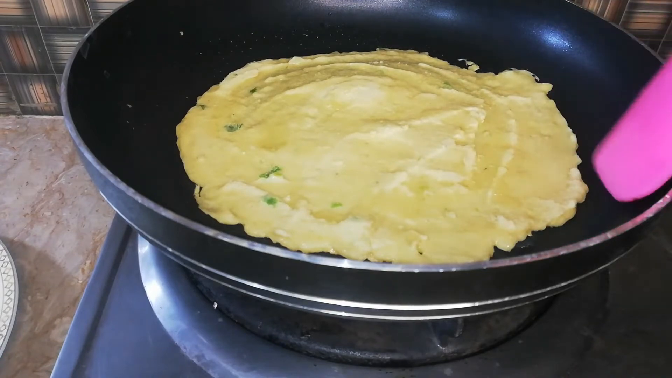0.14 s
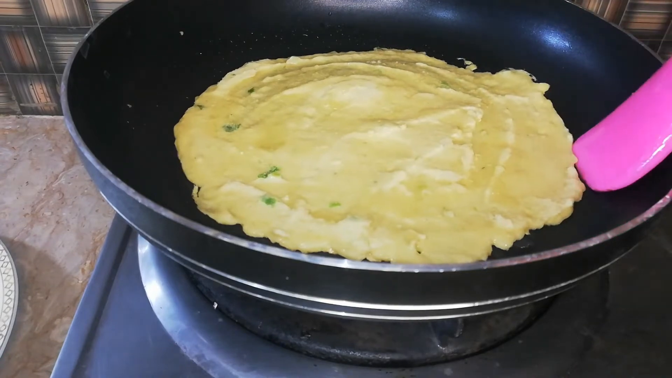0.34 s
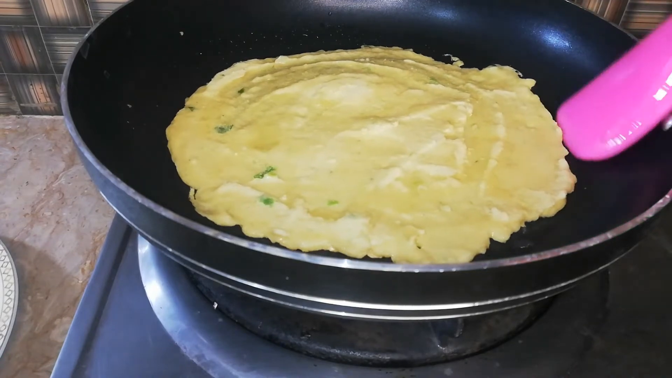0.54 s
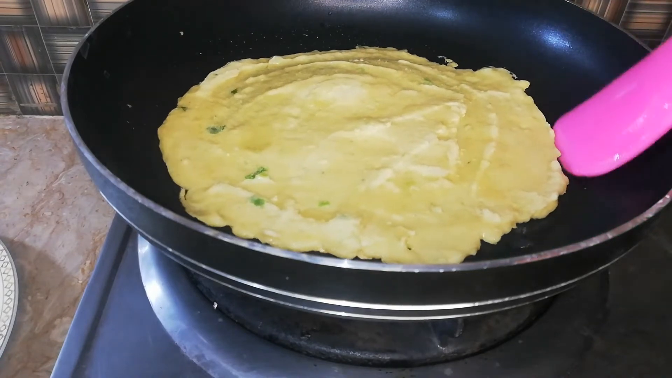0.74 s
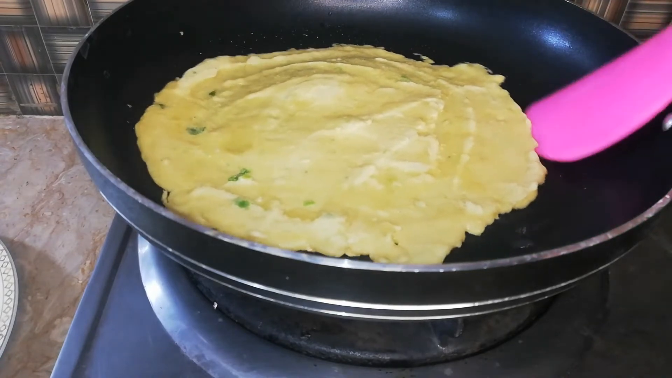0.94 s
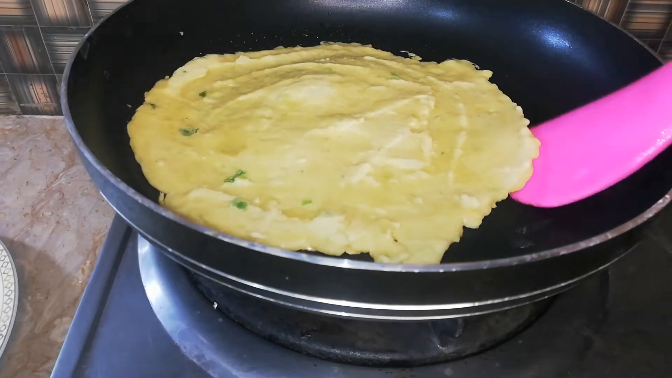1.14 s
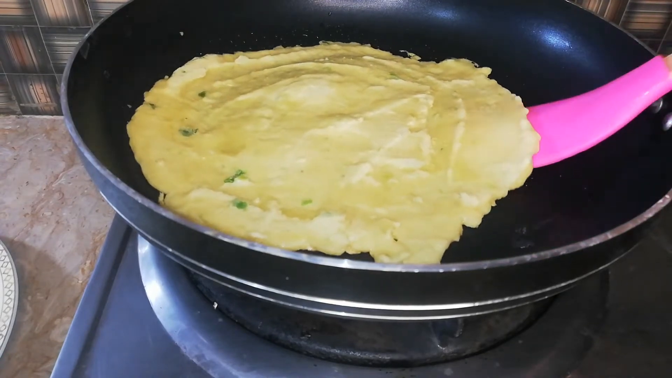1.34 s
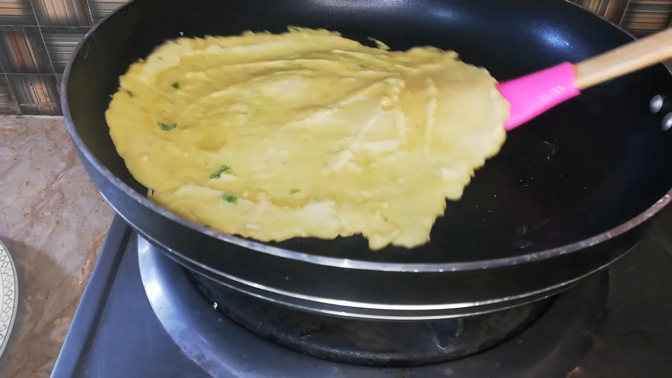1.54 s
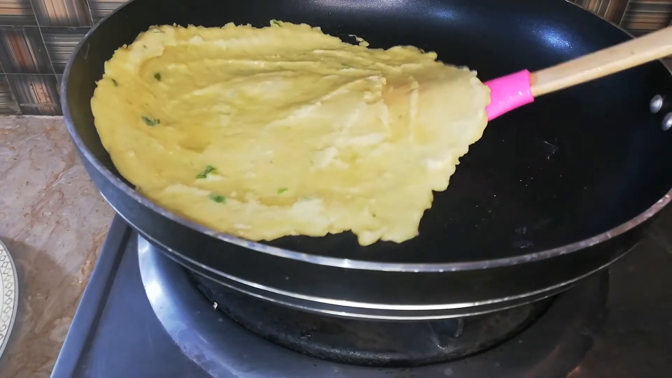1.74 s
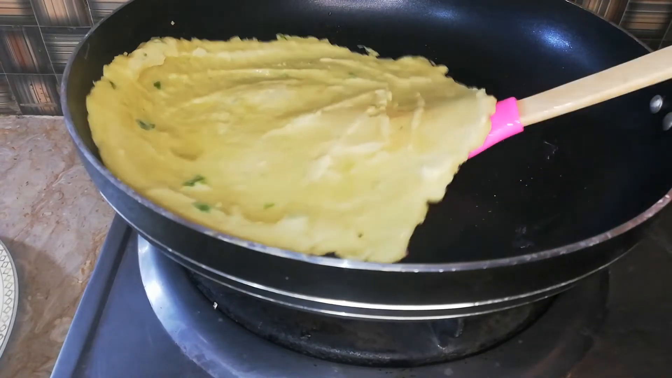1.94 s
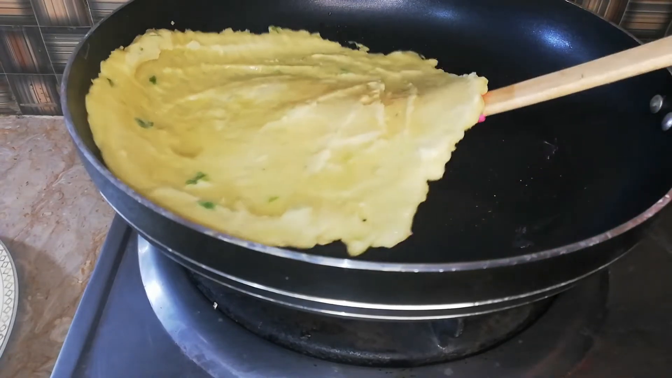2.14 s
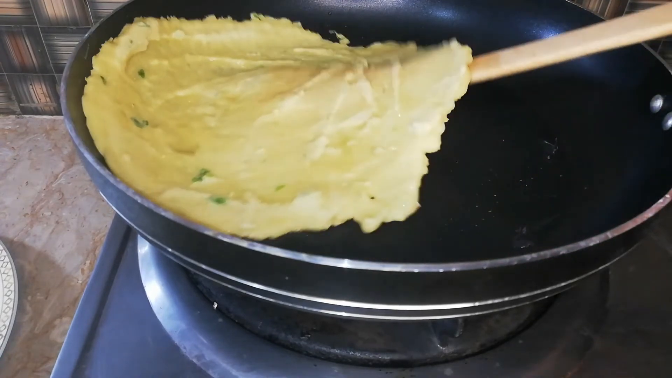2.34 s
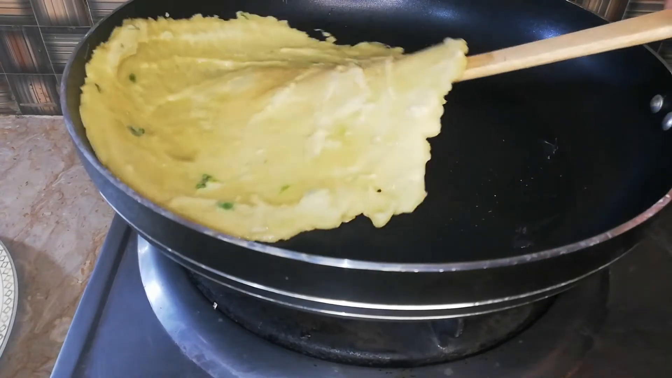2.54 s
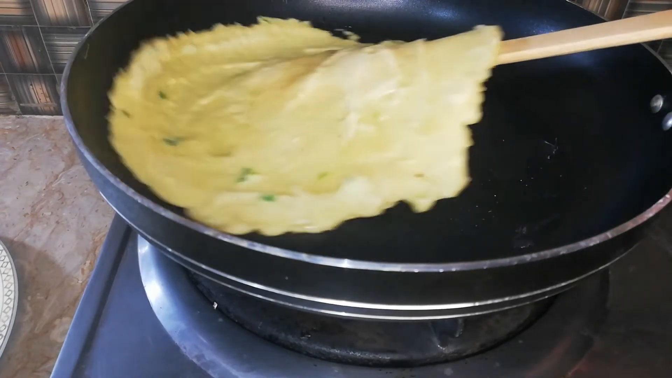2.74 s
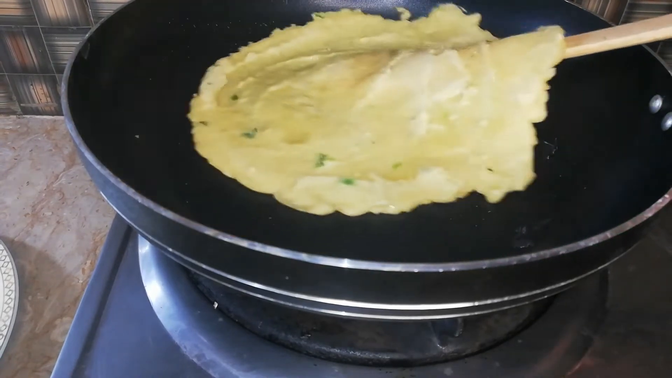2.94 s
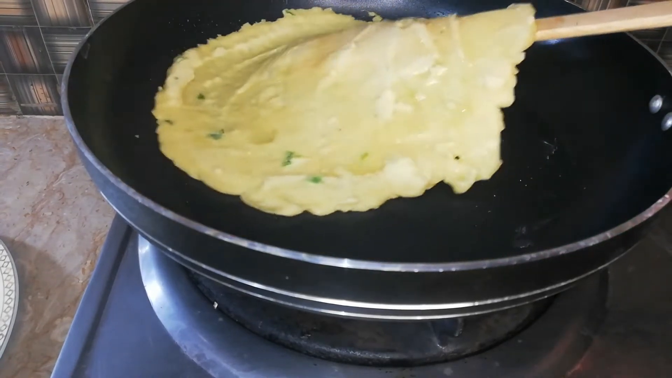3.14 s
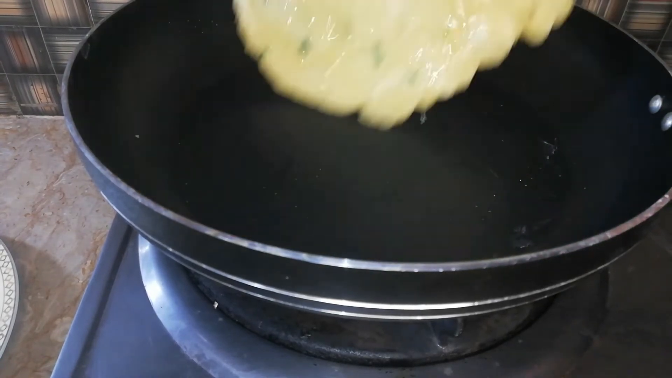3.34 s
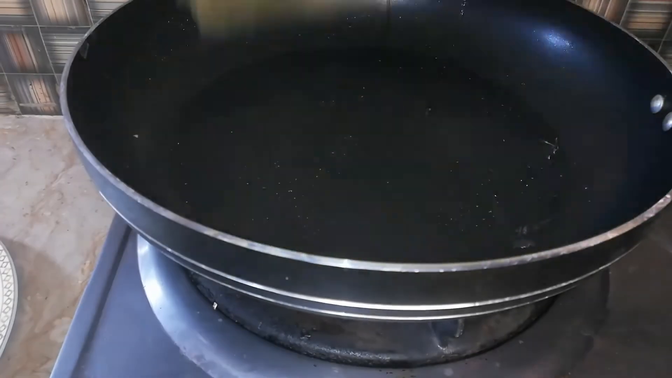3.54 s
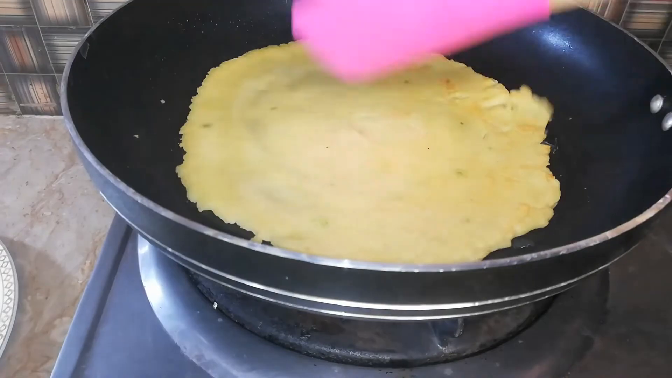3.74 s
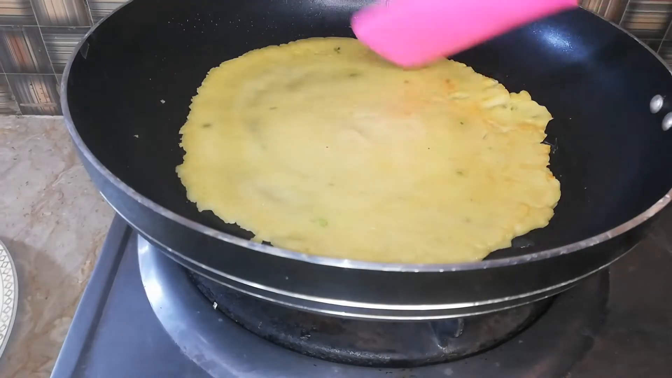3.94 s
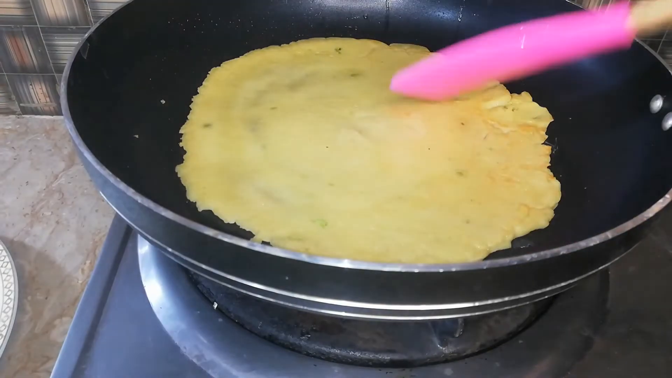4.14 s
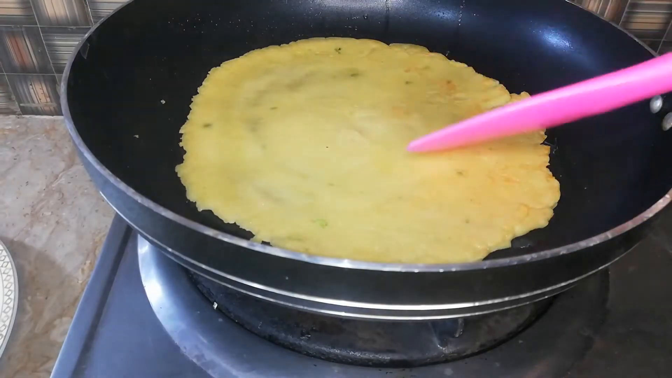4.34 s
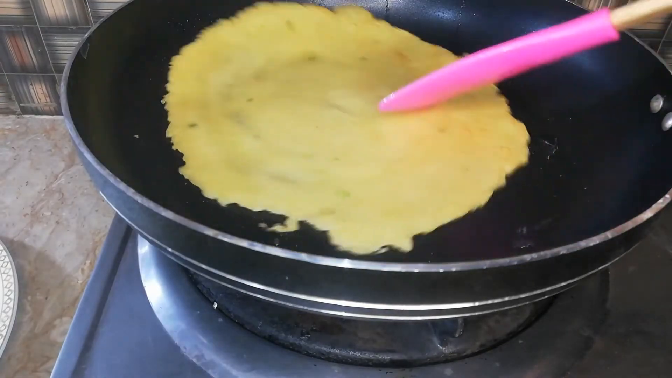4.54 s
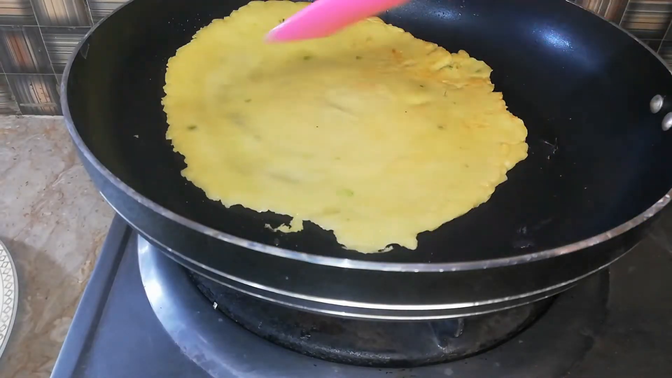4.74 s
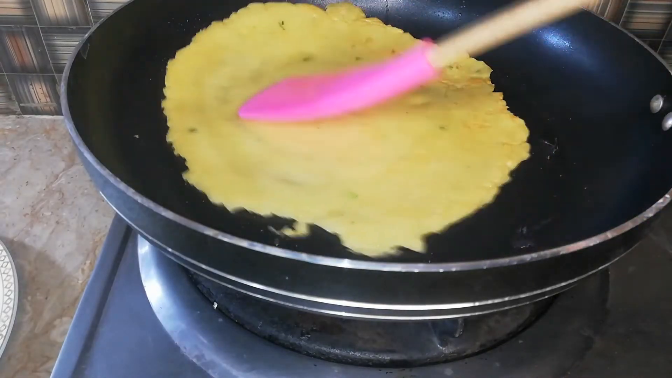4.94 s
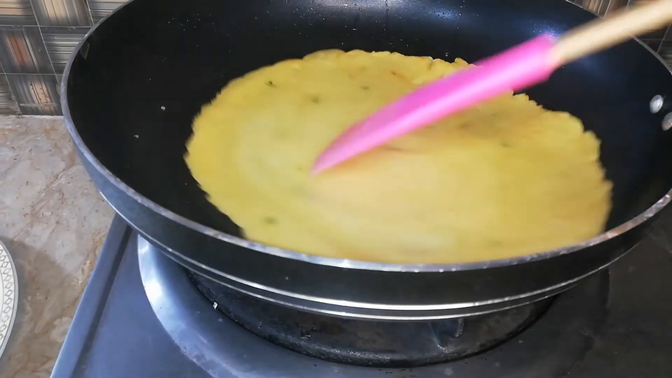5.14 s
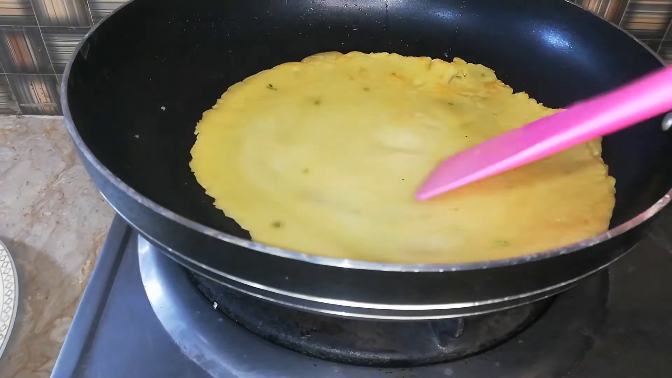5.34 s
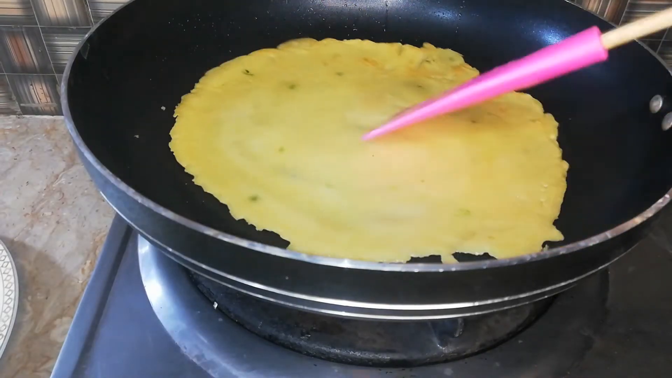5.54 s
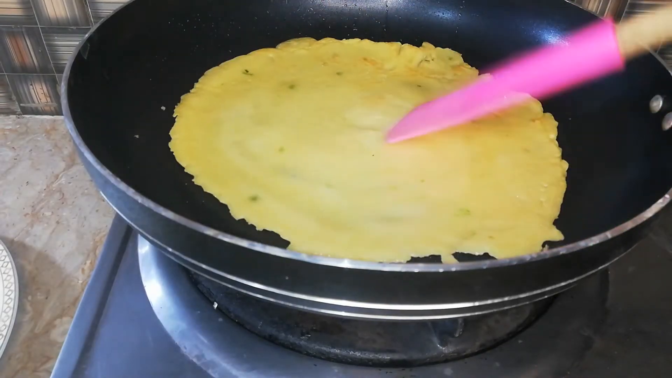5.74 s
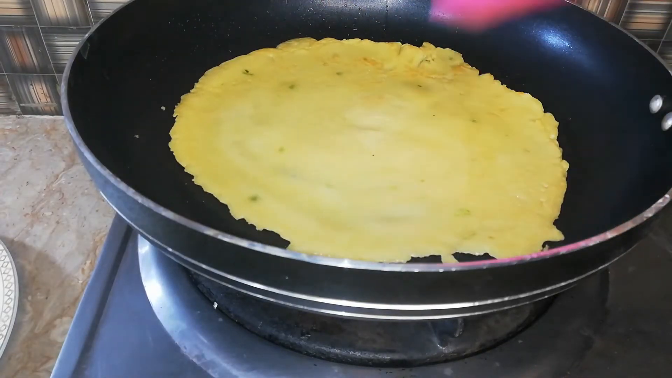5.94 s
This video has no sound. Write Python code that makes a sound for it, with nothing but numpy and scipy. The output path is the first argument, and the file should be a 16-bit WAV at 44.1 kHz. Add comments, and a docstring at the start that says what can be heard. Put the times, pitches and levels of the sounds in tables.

```python
"""A small kitchen, just above a frying pan on a softly rushing gas burner.
A silicone spatula rasps under a crepe and tears it loose, and the pan rocks and clacks on its support.
The crepe is dragged up in tugs, with hoarse squeaks, then flipped: it slaps down and the metal rings.
Its wet side flashes into steam and sizzles on while it is pushed around. Oil spits now and then."""
import sys
import numpy as np
from scipy import signal
from scipy.fft import rfft, irfft, next_fast_len
from scipy.io import wavfile
from scipy.ndimage import uniform_filter1d, map_coordinates

SR = 44100
rng = np.random.default_rng(int(sys.argv[2]) if len(sys.argv) > 2 else 0)


def transcribe(u):
    """Save the signal u as a 16-bit wav file named by the first command-line argument.

    u: samples, shape (n,) or (channels, n), limited to [-1, 1]; the rate is SR.
    q: integer samples, one column per channel.
    """
    v = np.clip(np.atleast_2d(u).T, -1, 1)
    q = np.round(v * 32767).astype(np.int16)
    wavfile.write(sys.argv[1], SR, q)


N = 268569
LOOSE_S, LIFT_S, LAND_S = 1.17, 3.317, 3.594  # the crepe comes loose, leaves the pan, lands wet side down
CONTACT_S, RELEASE_S = 0.088, 0.046  # attack and release of its contact with the pan


def amp(db):
    """Decibels to gain."""
    return 10 ** (np.asarray(db) / 20)


def unit(x):
    """Scale to rms 1."""
    return x / np.sqrt(np.mean(x ** 2) + 1e-20)


def balance(db):
    """Stereo gains that put the left channel db above the right."""
    return amp(db * np.array([[0.5], [-0.5]]))


def along(points, hz):
    """Read a curve of (Hz, value) points on a log frequency axis."""
    point_hz, values = np.transpose(points)
    return np.interp(np.log(hz + 1), np.log(point_hz + 1), values)


def resonance(hz, centre_hz, half_width_hz):
    """A resonant peak of height 1."""
    return 1 / (1 + ((hz - centre_hz) / half_width_hz) ** 2)


def filtered(x, response):
    """EQ a signal with a gain that is a function of frequency."""
    n = x.shape[-1]
    size = next_fast_len(n + 8192)
    return irfft(rfft(x, size) * response(np.fft.rfftfreq(size, 1 / SR)), size)[..., :n]


def add(track, s, sound):
    """Mix a sound into a track from time s."""
    start = max(round(s * SR), 0)
    part = sound[..., :N - start]
    track[:, start:start + part.shape[-1]] += part


def wobble(rate):
    """Smooth random modulation, rate points a second."""
    return map_coordinates(rng.standard_normal(int(N * rate / SR) + 4), [np.arange(N) * rate / SR])


def held(start, end, attack_s, release_s):
    """Envelope that rises from start, holds and dies away after end."""
    t = np.arange(N) / SR
    return np.clip((t - start) / attack_s, 0, 1) * np.exp(-np.maximum(t - end, 0) / release_s)


def struck(s, rise_s, t60):
    """Envelope that shoots up to its peak at time s, then decays."""
    t = np.arange(N) / SR - s
    return amp(-20 * np.maximum(-t, 0) / rise_s - 60 * np.maximum(t, 0) / t60)


def together(parts):
    """Joint envelope of unrelated (dB, envelope) parts, which add in power."""
    return np.sqrt(sum((amp(db) * shape) ** 2 for db, shape in parts))


def grains(rate, spread_db):
    """Two trains of tiny random clicks, rate a second, of widely varying size."""
    fires = rng.random((2, N)) < rate / SR
    size = amp(spread_db * np.clip(rng.standard_normal((2, N)), -2.5, 2.5))
    return unit(fires * rng.choice([-1, 1], (2, N)) * size)


def shifting(pair, depth_db, blur=5):
    """A drifting random EQ: resonances come and go as the patch of contact changes."""
    spectrum = signal.stft(pair, nperseg=1024)[2]
    drift = rng.standard_normal(spectrum.shape[1:])
    for axis in (0, 0, 1):  # smooth twice over frequency, once over time
        drift = uniform_filter1d(drift, blur, axis)
    return unit(signal.istft(spectrum * amp(depth_db * unit(drift)), nperseg=1024)[1][:, :N])


# Stereo width. Each row: frequency in Hz, side level over mid in dB.
STEREO_WIDTH = [(25, -30), (60, -22), (110, -18), (180, -13), (270, -4), (450, -1), (740, 0), (1220, -5),
                (2010, 0), (3330, .5), (15000, 0)]
def diffuse(pair, colour):
    """Two unrelated signals become coloured stereo of rms 1, near mono in the bass."""
    def response(hz):
        width = amp(along(STEREO_WIDTH, hz))
        return colour(hz) * np.array([np.ones_like(hz), width]) / np.sqrt(1 + width ** 2)
    mid, side = filtered(pair, response)
    return unit(np.array([mid + side, mid - side]))


def noise(colour, samples=N):
    """Coloured stereo noise of rms 1."""
    return diffuse(rng.standard_normal((2, samples)), colour)


# The kitchen's reverb. Each row: frequency in Hz, time to fall 60 dB in seconds.
ROOM_DECAY = [(150, 0.91), (800, 0.39), (3000, 0.33), (12000, 0.11)]
def kitchen(x, wet_db, build_s=0.00039):
    """Add a fresh reverb tail from the tiled walls; the treble dies first."""
    hz, t, spectrum = signal.stft(rng.standard_normal((2, SR // 2)), SR, nperseg=256)
    decay = amp(-60 * t / along(ROOM_DECAY, hz)[:, None])
    tail = diffuse(signal.istft(spectrum * decay, SR, nperseg=256)[1], np.ones_like)
    tail *= 1 - np.exp(-np.arange(tail.shape[1]) / SR / build_s)
    wet = signal.fftconvolve(x, tail / np.linalg.norm(tail[0]), axes=1)
    return amp(wet_db) * wet + np.pad(x, ((0, 0), (0, wet.shape[1] - x.shape[1])))


def near_walls(x, count=5, gain=0.17):
    """Weak early echoes off the pan rim and the tiles give a fine comb colour."""
    delays_s = rng.uniform(0.002, 0.012, (count, 2, 1))
    comb = lambda hz: 1 + gain * np.exp(-2j * np.pi * hz * delays_s).sum(axis=0)
    return filtered(x, comb) / np.sqrt(1 + count * gain ** 2)


# EQ curves of the room rumble and the flame. Each row: frequency in Hz, gain in dB.
RUMBLE_EQ = [(20, -4), (32, -3.5), (50, 2), (80, -3), (115, 0.5), (150, 0.5), (190, -10.5), (240, -6),
             (300, -12.5), (410, -10), (500, -29.5), (900, -61)]
FLAME_EQ = [(400, -19), (550, -4.5), (850, 4), (1050, 1.5), (1300, 4), (2000, -1.5), (4000, -4.5),
            (6000, -3), (8000, -23), (11000, -32), (16000, -19)]
def burner(rumble_db=-62.5, flame_db=-62, whistle_db=-72, whistle_hz=6047):
    """The bed: low room rumble, the soft rush of the gas flame and the faint whistle of its jet."""
    rumble = noise(lambda hz: amp(along(RUMBLE_EQ, hz)))
    flame = noise(lambda hz: amp(along(FLAME_EQ, hz))) * amp(0.85 * wobble(5.83))
    whistle = noise(lambda hz: resonance(hz, whistle_hz, 22))
    return amp(rumble_db) * rumble + amp(flame_db) * flame + amp(whistle_db) * whistle


# Modes of the pan and stove top. Each row: frequency in Hz, relative level when struck in dB,
# time to fall 60 dB in seconds, boost when rubbed in dB.
PAN_MODES = [(93.8, -19, 0.7, -2), (158.4, -11, 0.28, 0), (183.3, -6.5, 0.32, 2), (225.5, -6.5, 0.47, 7),
             (261.8, -10, 0.27, 5), (305.2, -10, 0.31, 5), (390.5, -19, .3, 0), (407.7, -10, 0.39, 6),
             (500, -19.5, 0.42, 2), (745, 1, 0.11, 5), (774, -9, 0.31, -0.5), (887, -10.5, 0.35, 2.5),
             (1051, 2.5, 0.086, 2.5), (1178, -4, 0.18, 5.5), (1351, -2, 0.16, 2.5), (1654, 0.5, 0.11, 6.5),
             (1824, -13, .2, 2.5), (2011, 1, 0.1, 5.5), (2030, -11, 0.37, 1), (2106, -7, .22, -1),
             (2320, -18, .14, 2), (2686, -6, 0.16, 4), (2774, 0.5, 0.066, 5), (3360, -9, 0.11, 5.5),
             (3605, -4.5, 0.14, 2.5), (4530, -14, 0.2, 1), (4860, -11, 0.13, 3), (5770, -10, .08, 3),
             (7150, -24, .1, 2.5), (7560, -20, .1, 1.5)]
def pan_ring(cutoff_hz, build_cycles=2.4):
    """The modes ring after one blow; a soft contact has a low cutoff and leaves the high ones quiet."""
    t = np.arange(SR * 3 // 4) / SR
    out = np.zeros((2, len(t)))
    for hz, db, t60, _ in PAN_MODES:
        phase = rng.uniform(0, 2 * np.pi)
        spread = rng.choice([-1, 1]) * np.arctan(amp(along(STEREO_WIDTH, hz))) * np.array([[1], [-1]])
        attack = 1 - np.exp(-t * hz / build_cycles)
        decay = amp(db + rng.normal(0, 1) - 60 * t / t60)
        lowpass = 1 / np.sqrt(1 + (hz / cutoff_hz) ** 6)
        out += attack * decay * lowpass * np.sin(2 * np.pi * hz * t + phase + spread)
    return out


def pan_grains(curve, rate, spread_db, share=1):
    """A grain texture, shaped by an EQ curve and a share of the boost at each pan mode."""
    def colour(hz):
        boost_db = sum(db * resonance(hz, mode_hz, 36 * np.sqrt(mode_hz / 2000))
                       for mode_hz, _, _, db in PAN_MODES)
        return amp(along(curve, hz) + share * boost_db)
    return diffuse(grains(rate, spread_db), colour)


def through_modes(hz, direct_db=-7):
    """A blow's colour: each mode passes as much as it rings, the rest leaks out directly."""
    mode_power = sum(amp(db) ** 2 * resonance(hz, mode_hz, 24 * np.sqrt(mode_hz / 2000))
                     for mode_hz, db, _, _ in PAN_MODES)
    return np.sqrt(amp(direct_db) ** 2 + mode_power)


def contact():
    """Two envelopes of the loose crepe touching the pan: cooked side down, then wet side down."""
    return held(LOOSE_S, LIFT_S, CONTACT_S, RELEASE_S), held(LAND_S, N / SR, CONTACT_S, RELEASE_S)


# Tugs slide the crepe and let steam out from under it. Each row: time of top speed in seconds,
# build-up in seconds, rub level in dB, steam level in dB, fizz boost or cut in dB.
CREPE_TUGS = [(1.648, 0.023, -51.5, -51.5, 0), (1.76, 0.089, -53.5, -72, 1),
              (1.923, 0.14, -54.5, -51, -2.5), (2.1, 0.066, -53.5, -49, 9.5), (2.218, 0.036, -51, -50, -5),
              (2.287, 0.039, -54.5, -48.5, -2), (2.415, 0.034, -49.5, -50.5, -5),
              (2.5, 0.052, -55.5, -55, -6), (2.815, 0.083, -57, -51, -5), (2.885, 0.048, -53.5, -47, -5),
              (3.0, 0.059, -57.5, -58, -4), (3.205, 0.079, -62, -51, -4), (3.81, 0.087, -54.5, -52.5, -1.5),
              (3.985, 0.089, -53, -54.5, 1), (4.395, 0.036, -60, -50.5, -5), (4.59, 0.033, -58, -63, 2),
              (5.09, 0.18, -52.5, -55, 2.5), (5.25, 0.056, -56, -56.5, 2), (5.44, 0.18, -56, -58, 3),
              (5.83, .06, -63, -66, 4)]
def tugs(stop_share=0.85):
    """Each tug's speed curve, which builds up and stops a little faster, with its three levels."""
    for s, build_s, rub_db, steam_db, fizz_db in CREPE_TUGS:
        t = np.arange(N) / SR - s
        speed = np.exp(-(t / np.where(t < 0, build_s, stop_share * build_s)) ** 2)
        yield speed, rub_db, steam_db, fizz_db


def steam(bare_pan_db=-64.5, rest_db=-62, loose_db=-57, wet_side_db=-58.5, flash_db=-38, boil_db=-51.5):
    """The sizzle's envelope: steam swells with each tug, flashes as wet batter lands, then boils down."""
    loose, wet = contact()
    resting = held(-1, LIFT_S, CONTACT_S, RELEASE_S)
    steady = [(bare_pan_db, 1), (rest_db, resting), (loose_db, loose), (wet_side_db, wet)]
    flash = struck(LAND_S, rise_s=0.0033, t60=0.37)
    boil = struck(LAND_S + 0.28, rise_s=CONTACT_S, t60=3.2)
    puffs = [(db, speed) for speed, _, db, _ in tugs()]
    sputter = amp(0.5 * (loose + wet) * wobble(25))
    return together(steady + [(flash_db, flash), (boil_db, boil)] + puffs) * sputter


# EQ curve of the sizzle. Each row: frequency in Hz, gain in dB.
SIZZLE_EQ = [(800, -24), (2000, -3), (3500, -2), (5000, 0.5), (6200, -0.5), (7800, 2), (10000, -3),
             (12500, -8.5), (16000, -11.5)]
def sizzle(crackle_db=-10, sputter_db=1.2, fizz_hz=8500):
    """Countless small steam bursts make a hiss with crackle on top; the finest fizz comes in spurts."""
    hiss = shifting(pan_grains(SIZZLE_EQ, rate=12000, spread_db=4.5, share=0.49), depth_db=1.1)
    fizz = filtered(hiss, lambda hz: hz ** 4 / (hz ** 4 + fizz_hz ** 4))
    spurts_db = sum(db * speed for speed, _, _, db in tugs())
    flicker_db = sputter_db * sum(contact()) * wobble(22.12)
    hiss += fizz * (amp(spurts_db + flicker_db) - 1)
    crackle = pan_grains(SIZZLE_EQ, rate=300, spread_db=5, share=0.49)
    return steam() * (hiss + amp(crackle_db) * crackle) * balance(1.2)


def fine_spray(level_db=-67, centre_hz=8000, width_octaves=0.7):
    """Tiny droplets spit at random once the wet side is down."""
    band = lambda hz: np.exp(-0.5 * (np.log2((hz + 1) / centre_hz) / width_octaves) ** 2)
    ticks = diffuse(grains(rate=45, spread_db=2), band)
    _, wet = contact()
    return amp(level_db) * wet * kitchen(ticks, wet_db=-4)[:, :N]


# Sharp oil pops, plus two lower ticks: light spatula taps or wet smacks. Each row: start in seconds,
# level in dB, pitch in Hz, ring against the spike in dB, left over right in dB.
POPS_AND_TICKS = [(1.5092, -30, 7000, -14, 3), (1.5616, -36, 6500, -14, 3), (1.6435, -37, 7500, -14, -3),
                  (1.8364, -32, 8000, -10, 5), (1.9293, -33, 7500, -10, 2), (2.102, -22, 4830, -13, -4),
                  (2.1086, -32, 6000, -11, -5), (2.2009, -33, 6000, -12, 1), (2.343, -32.5, 10000, -23, 7),
                  (2.592, -30, 9000, -23, 2), (2.6495, -32, 9500, -18, -5), (2.6932, -34, 7000, -14, -5),
                  (2.8841, -34, 7000, -12, -4), (3.1034, -40, 8000, -12, 5), (3.769, -29.5, 6000, -14, 5),
                  (3.776, -28, 2477, 3, -5), (3.8061, -30, 8350, -10, 7), (3.8518, -35, 2380, -3, -3),
                  (3.855, -29, 6500, -14, 4), (3.976, -28, 6500, -13, 7), (4.2448, -37, 7050, -10, 1),
                  (4.3932, -37, 7950, -6, 4), (4.4005, -34, 7970, -6, 4), (4.4812, -30, 9000, -8, 5),
                  (4.483, -25.5, 8000, -16, 7), (4.5892, -37, 8950, -12, 5), (4.7128, -45, 6000, -12, -2),
                  (4.8088, -34.5, 8200, -4, 6), (4.8163, -33, 9000, -12, 5), (4.9055, -37, 7460, -10, -6),
                  (5.0438, -34, 8780, -6, 6), (5.2177, -32, 9000, -14, 6), (5.3084, -32.5, 8000, -10, 9),
                  (5.4245, -34.5, 8040, -8, 7), (5.513, -29, 7450, -19, 7), (5.5387, -32, 11000, -12, -2),
                  (5.5516, -32.5, 7900, 3, 3), (5.5913, -29.5, 9400, -3, 5), (5.6381, -31.5, 8500, -18, 2),
                  (5.7359, -37, 8000, -16, 8), (5.8105, -30.5, 7500, -14, -1), (5.818, -35, 8500, -14, 3),
                  (5.8916, -32, 8950, -19, 6), (5.9341, -37, 9000, -18, -4), (6.0732, -38, 9000, -12, 2)]
def pops_and_ticks(spike_cycles=0.24, ring_s=0.00028, low_cut_hz=2200, high_cut_hz=16000, trim_db=-1):
    """Each is one sharp spike and a brief ring; in an oil pop, a droplet bursts and its cavity rings."""
    out, t = np.zeros((2, N)), np.arange(SR // 50) / SR
    band = lambda f: 1j * f / (low_cut_hz + 1j * f) / (1 + 1j * f / high_cut_hz) ** 2
    for s, db, hz, ring_db, left_db in POPS_AND_TICKS:
        envelope = np.exp(-t * hz / spike_cycles) + amp(ring_db) * np.exp(-t / ring_s)
        phase = rng.uniform(-np.pi / 3, np.pi / 3, (2, 1))
        snap = filtered(envelope * np.cos(2 * np.pi * hz * t + phase), band)
        snap /= np.abs(snap).max(axis=1, keepdims=True)
        add(out, s, kitchen(amp(db + trim_db) * balance(left_db) * snap, wet_db=-1))
    return out


# EQ curve of the stove's thud. Each row: frequency in Hz, gain in dB.
THUD_EQ = [(25, -24), (50, 2), (85, 6), (120, -14), (165, 2), (260, 0), (390, -10), (520, -45), (1200, -53)]
# The pan rocks. Each row: start in seconds, clack level in dB, shared fader for hum and thud in dB.
PAN_KNOCKS = [(1.271, -53, -45.5), (1.3179, -30.5, -37), (1.376, -27, -35.5), (1.4292, -24, -34),
              (1.477, -32, -38.5), (2.69, -49, -53), (2.9064, -39.5, -45.5), (3.7175, -32, -34.5),
              (3.8345, -28, -37.5), (4.03, -58, -46), (5.32, -70, -47.5), (5.74, -66, -51)]
def pan_knocks(clack_hz=827, clack_s=0.00044, sweep=0.43, sweep_s=0.00062, tick_hz=1900, tick_s=0.00025,
               tick_db=-7, hum_db=-4.5, thud_db=-13, thud_t60=0.25):
    """The pan tips onto its support with a tick and a clack, then the stove top hums and thuds."""
    out, t = np.zeros((2, N)), np.arange(SR // 4) / SR
    # Fast bending waves arrive first, so the clack's pitch starts high and drops.
    cycles = clack_hz * (t + sweep * sweep_s * (1 - np.exp(-t / sweep_s)))
    clack = 1.27 * np.sqrt(t / clack_s) * np.exp(-t / clack_s / 2) * np.sin(2 * np.pi * cycles)
    clack += amp(tick_db) * np.exp(-t / tick_s) * np.sin(2 * np.pi * tick_hz * t)
    for s, db, stove_db in PAN_KNOCKS:
        thud = noise(lambda hz: amp(along(THUD_EQ, hz)) * hz / (hz + 250), len(t))
        add(out, s, kitchen(amp(db) * np.array([clack, clack]), wet_db=-6))
        add(out, s, amp(stove_db + hum_db) * pan_ring(cutoff_hz=670))
        add(out, s, amp(stove_db + thud_db - 60 * t / thud_t60) * thud)
    return out


# Hoarse squeaks, plus one short hiss from the bare pan during the flip. Each row: peak time in seconds,
# level in dB, pitch in Hz, half bandwidth in Hz, swell and fade time in seconds.
SQUEAKS_AND_HISS = [(0.76, -66, 7730, 250, .035), (1.098, -59.5, 2770, 353, 0.21),
                    (1.2, -68, 652, 50, 0.11), (1.107, -52, 2600, 600, 0.008),
                    (1.306, -43, 3100, 500, .002), (1.368, -58, 4580, 200, 0.057),
                    (1.382, -55, 2580, 220, 0.059), (1.898, -58.5, 2370, 110, 0.096),
                    (1.93, -57, 4700, 250, .025), (2.03, -51, 4400, 400, .01),
                    (2.111, -50, 4930, 200, 0.017), (2.163, -52, 4750, 280, 0.018),
                    (2.204, -53, 7600, 450, 0.03), (2.253, -55.5, 1770, 220, 0.074),
                    (2.281, -48, 5280, 190, 0.018), (2.292, -55, 4400, 200, 0.024),
                    (2.415, -57, 2300, 180, 0.021), (2.52, -63, 7000, 250, .05),
                    (2.647, -61, 9600, 150, 0.011), (2.818, -57.5, 2330, 120, .025),
                    (2.886, -55, 3660, 80, .049), (2.89, -59, 2880, 80, 0.048),
                    (2.893, -65, 8100, 180, .025), (3.19, -59, 8600, 160, .025),
                    (3.199, -58.5, 3620, 80, 0.1), (3.23, -63, 826, 60, 0.12), (3.25, -55, 2920, 220, 0.04),
                    (3.31, -62, 6950, 200, 0.11), (3.337, -60.5, 2270, 30, 0.039),
                    (3.528, -62.5, 4270, 600, .04), (5.11, -62, 3500, 90, 0.098),
                    (5.168, -55.5, 2830, 110, 0.1)]
def squeaks_and_hiss():
    """Narrow bands of noise swell and fade; the squeaks are resonances fed by sticking and slipping."""
    out, t = np.zeros((2, N)), np.arange(SR // 2) / SR - 1 / 4
    edge_fade = np.cos(2 * np.pi * t)
    for s, db, hz, half_width_hz, swell_s in SQUEAKS_AND_HISS:
        tone = noise(lambda f: resonance(f, hz, half_width_hz), len(t))
        add(out, s + t[0], amp(db) * tone * np.exp(-(t / swell_s) ** 2) * edge_fade)
    return out


# EQ curves of the crepe's two sides rubbing. Each row: frequency in Hz, gain in dB.
COOKED_SIDE_EQ = [(200, -37), (380, -4.5), (540, -12), (760, -2.5), (1050, -1.5), (1300, 0), (1700, 2.5),
                  (2050, 0.5), (2380, 2.5), (2700, -2.5), (3500, 0.5), (4000, -0.5), (4950, -1),
                  (5600, -7.5), (7500, -6), (10000, -19), (16000, -29)]
WET_SIDE_EQ = [(200, -26), (380, -6.5), (540, -12.5), (750, -4), (1000, -7), (1260, 2.5), (1600, -0.5),
               (2000, 2), (2700, -1), (2900, 2), (3200, -6), (3480, 1), (3900, -2), (4700, -0.5),
               (8000, -15), (16000, -33)]
def crepe_slide(flip_s=3.45, drag_db=-61, press_db=-56.5):
    """The crepe sticks and slips over the pan: first its crisp cooked side, then the soft wet one."""
    crisp = pan_grains(COOKED_SIDE_EQ, rate=4000, spread_db=2.5)
    soft = pan_grains(WET_SIDE_EQ, rate=6000, spread_db=2.5, share=0.91)
    rub = np.where(np.arange(N) / SR < flip_s, shifting(crisp, 2.2), shifting(soft, 1.2))
    grip = amp(0.8 * wobble(35))
    loose, wet = contact()
    light_rubbing = [(drag_db, loose), (press_db, wet)]
    pulls = [(db, speed) for speed, db, _, _ in tugs()]
    return rub * grip * together(light_rubbing + pulls)


# EQ curve of the blade's rasp. Each row: frequency in Hz, gain in dB.
BLADE_EQ = [(200, -8), (400, -23), (540, -23), (650, -8), (760, -9.5), (1200, -4), (1450, -5.5),
            (1700, 0.5), (2200, -2), (2700, 0), (3600, -2), (4600, -1.5), (5500, -6), (8000, -6.5),
            (11000, -18.5), (16000, -24)]
# Pushes over the pan floor. Each row: start in seconds, end in seconds, level in dB.
BLADE_PUSHES = [(0.959, 1.232, -51), (1.218, 1.342, -46.5), (1.337, 1.44, -43.5)]
# Stuck batter breaks loose. Each row: peak time in seconds, level in dB, treble shelf in dB.
BATTER_PEELS = [(0.997, -53, -10), (1.097, -38, -9), (1.155, -46.5, -3), (1.237, -38, -4), (1.256, -44, -3),
                (1.305, -48, 2), (1.346, -40, -9), (1.42, -53, -1), (2.102, -43.5, 4)]
def spatula(shelf_hz=6500):
    """The blade chatters finely over the pan and tears stuck patches free in short bursts."""
    rasp = pan_grains(BLADE_EQ, rate=8300, spread_db=3.5)
    force = together((db, held(start, end, attack_s=0.027, release_s=0.044))
                     for start, end, db in BLADE_PUSHES)
    out = rasp * force * amp(1.2 * wobble(60.8))
    tear = pan_grains(BLADE_EQ, rate=7200, spread_db=2)
    treble = filtered(tear, lambda hz: hz ** 2 / (hz ** 2 + shelf_hz ** 2))
    for s, db, treble_db in BATTER_PEELS:
        burst = amp(db) * struck(s, rise_s=0.0021, t60=0.13)
        out += burst * (tear + (amp(treble_db) - 1) * treble)
    return out * balance(-1.4)


# EQ curve of the wet splat. Each row: frequency in Hz, gain in dB.
SPLAT_EQ = [(60, -23), (120, -9), (190, -9.5), (400, 1), (540, -6), (800, -4), (1100, -1), (1500, -1),
            (1900, -3.5), (3000, -4), (5000, -4), (6500, -13), (8000, -9), (11000, -20), (16000, -29)]
# Parts of the crepe land one after another. Each row: time in seconds, level in dB.
LANDINGS = [(3.5928, -32), (3.5952, -19.5), (3.5996, -20.5), (3.6068, -26.5), (3.613, -40), (3.622, -36),
            (3.668, -34.5)]
def crepe_slap(rise_s=0.001992, splat_t60=0.042, ring_db=-28, hum_db=-29,
               thud_db=-40, thud_rise_s=0.014, thud_t60=0.66):
    """The wet side hits the pan: a smeared splat, ringing metal, then the stove's hum and loose thud."""
    out, t = np.zeros((2, N)), np.arange(SR // 2) / SR
    envelope = (1 - np.exp(-(t / rise_s) ** 2)) * amp(-60 * t / splat_t60)
    for s, db in LANDINGS:
        splat = envelope * noise(lambda hz: amp(along(SPLAT_EQ, hz)) * through_modes(hz), len(t))
        add(out, s - rise_s / 2, kitchen(amp(db) * splat, wet_db=-3))
    add(out, LAND_S, amp(ring_db) * pan_ring(cutoff_hz=7000))
    add(out, LAND_S + thud_rise_s, amp(hum_db) * pan_ring(cutoff_hz=450))
    thud = noise(lambda hz: amp(along(THUD_EQ, hz)), len(t)) * (1 - np.exp(-t / thud_rise_s))
    add(out, LAND_S, amp(thud_db - 60 * t / thud_t60) * thud)
    return out * balance(-1.6)


def scene():
    """The full mix at the stove, heard from just above the pan."""
    textures = near_walls(spatula() + crepe_slide() + sizzle())
    details = squeaks_and_hiss() + pops_and_ticks() + fine_spray()
    return textures + details + pan_knocks() + crepe_slap() + burner()


def record(dry):
    """A brick-wall high cut on the whole mix."""
    return filtered(dry, lambda hz: hz < 15850)


dry = scene()
out = record(dry)
transcribe(out)
```